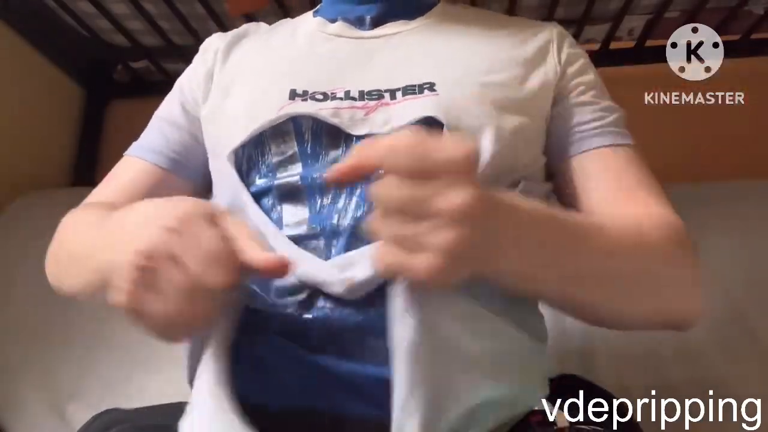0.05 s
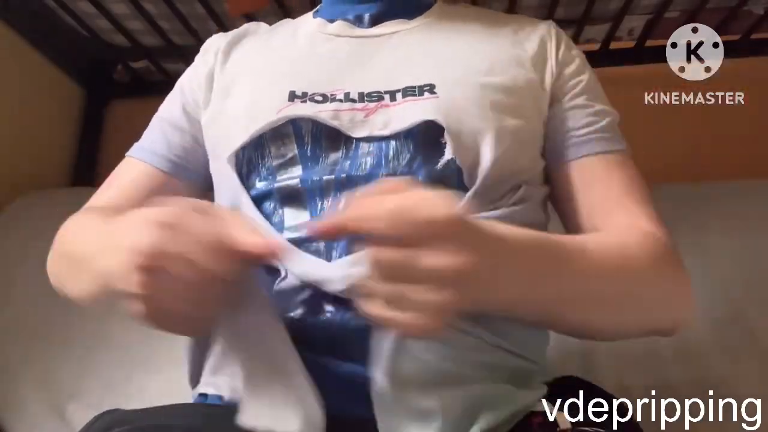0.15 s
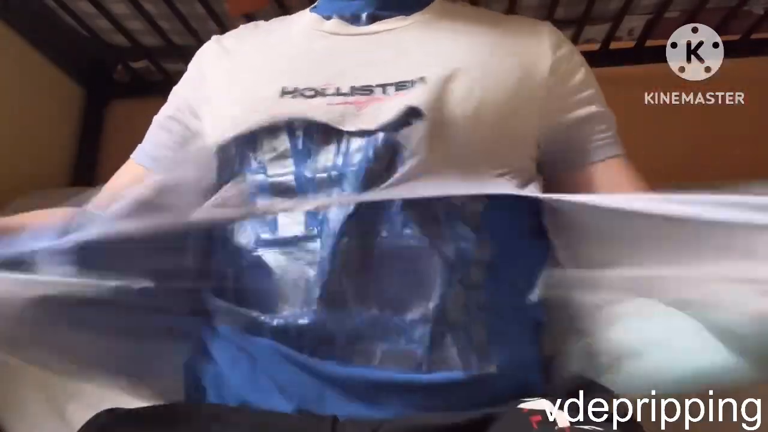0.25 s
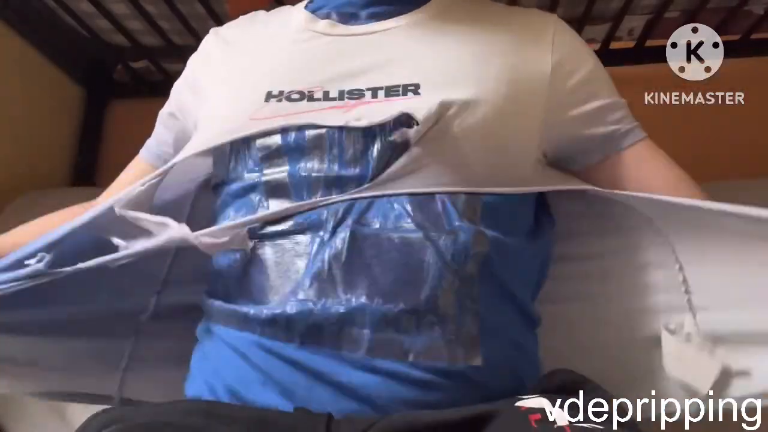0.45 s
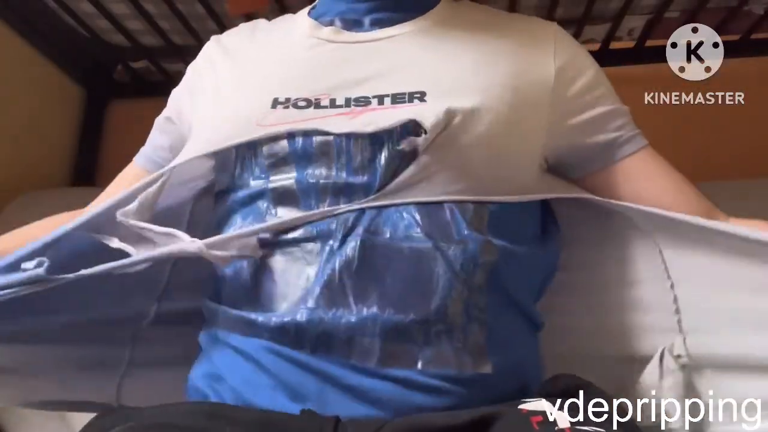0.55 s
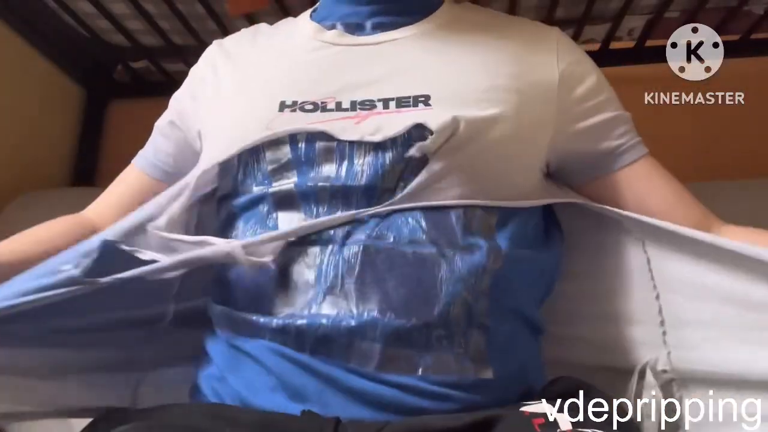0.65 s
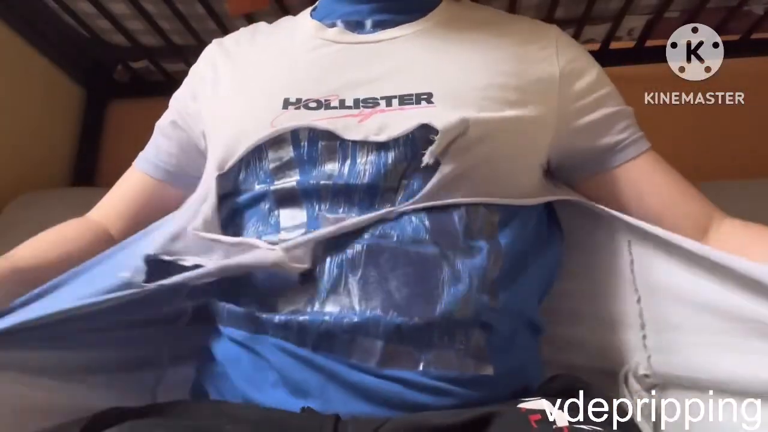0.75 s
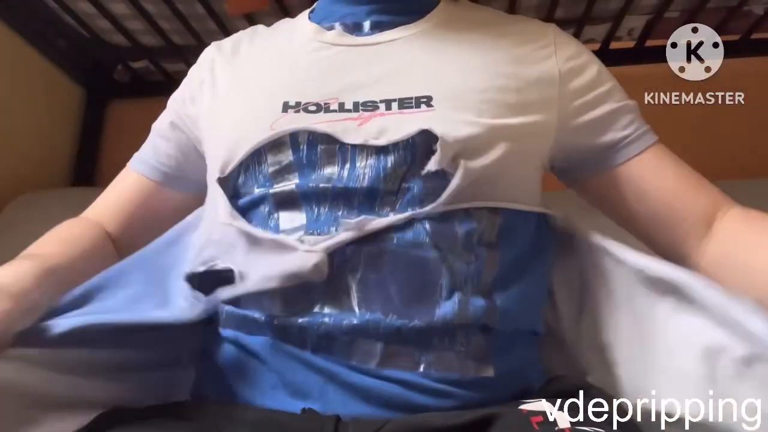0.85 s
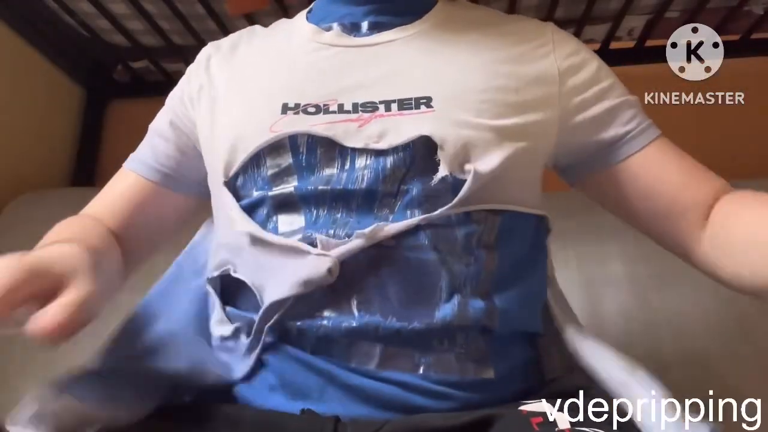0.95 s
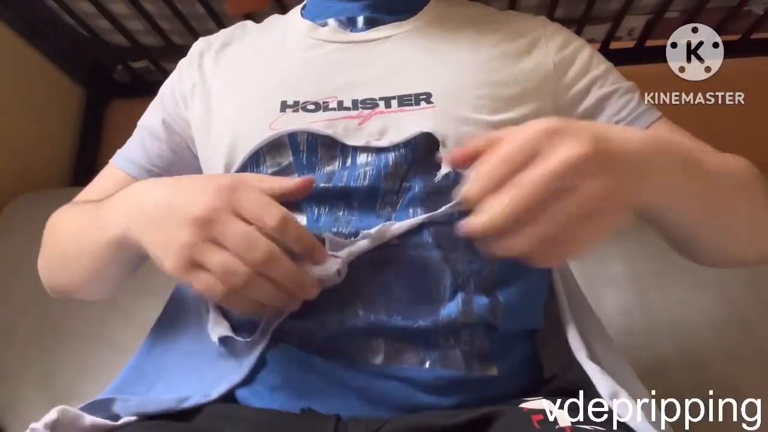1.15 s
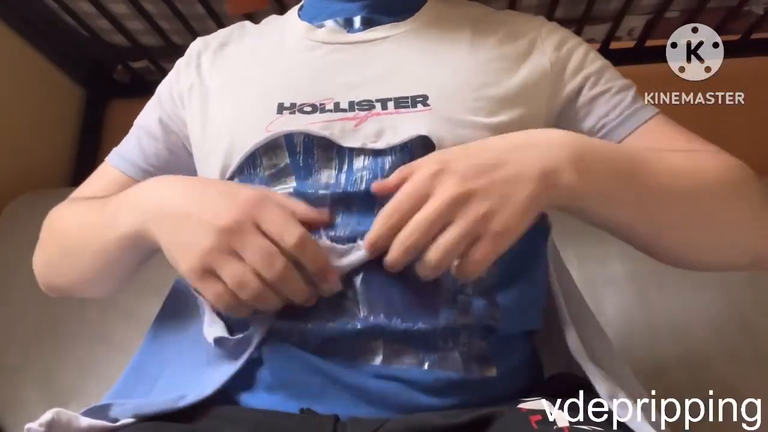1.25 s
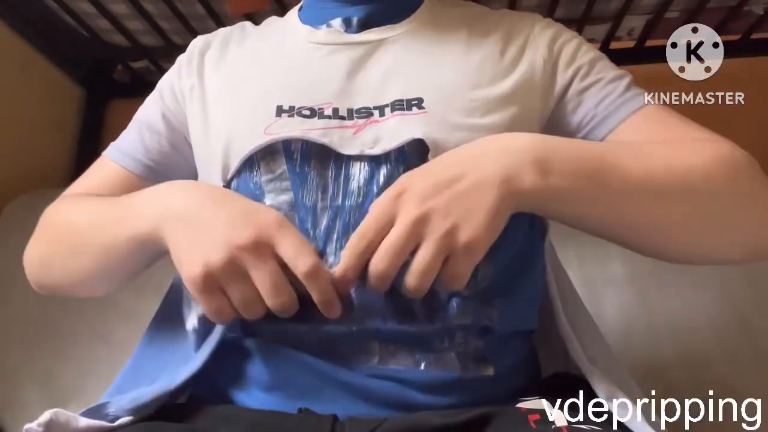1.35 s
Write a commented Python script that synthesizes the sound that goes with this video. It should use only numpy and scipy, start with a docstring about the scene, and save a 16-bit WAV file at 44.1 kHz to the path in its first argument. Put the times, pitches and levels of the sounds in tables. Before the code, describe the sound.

A cotton shirt is ripped by hand in one short, loud tear, with crackling threads and a low boom. Faint sliding, soft bumps and rustling of the cloth follow, close to the microphone in a small room.

```python
"""A cotton shirt is yanked apart by hand, close to the microphone in a small furnished room.
The edge gives with a sharp zip, then threads break in quick runs, each with a crack and a recoil,
while the taut cloth flutters. A low, wavering resonant hum swells into a boom during the rip.
Afterwards the cloth slides, bumps softly and is gathered up again."""
import sys
import numpy as np
from scipy import signal
from scipy.fft import rfft, irfft
from scipy.io import wavfile

SR = 44100
rng = np.random.default_rng(int(sys.argv[2]) if len(sys.argv) > 2 else 0)


def log_audio(samples):
    """Write samples as a 16-bit WAV file to the path given in sys.argv[1]."""
    # one column per channel
    frames = np.atleast_2d(samples).T
    # limit to full scale, then quantise
    limited = np.clip(frames, -1, 1)
    pcm = np.round(limited * 32767).astype(np.int16)
    wavfile.write(sys.argv[1], SR, pcm)


N = 61739
TIME, HZ = np.arange(N) / SR, np.fft.rfftfreq(2 * N, 1 / SR)


def amp(db):
    """Decibels to gain."""
    return 10 ** (np.asarray(db) / 20)

def unit(x):
    """Scales to rms 1."""
    return x / np.sqrt(np.mean(x ** 2) + 1e-20)

def read(points, hz=HZ):
    """Interpolates on a log-frequency axis."""
    f, value = np.transpose(points)
    return np.interp(np.log(hz + 1), np.log(f + 1), value)

def curve(points):
    """Control curve at every sample."""
    return np.interp(TIME, *np.transpose(points))

def shape(x, gain):
    """Filters by a gain per frequency."""
    return irfft(rfft(x, 2 * N) * gain)[..., :N]

def ring(x, db):
    """Minimum-phase filter: ringing follows the click."""
    log_gain = np.log(amp(db))
    phase = -signal.hilbert(np.r_[log_gain, log_gain[-2:0:-1]]).imag[:len(HZ)]
    return shape(x, np.exp(log_gain + 1j * phase))

def drift(rate_hz):
    """Random wander of rms 1."""
    return unit(shape(rng.standard_normal(N), np.exp(-(HZ / rate_hz) ** 2)))

def taps(table, rise_s):
    """Envelope of touches: linear rise, exponential decay."""
    return sum(amp(db) * np.clip((TIME - s) / rise_s, 0, 1) * np.exp(-np.maximum(TIME - s, 0) / decay_s)
               for s, db, decay_s in table)

# Direct and diffuse sound. Each row: frequency in Hz, left-right correlation.
DIRECT = [(60, .96), (300, 0.53), (1500, 0.59), (4000, .45), (7000, .7), (10000, .95), (16000, 0.88)]
DIFFUSE = [(60, 1), (200, 0.25), (600, 0.5), (5000, 0), (16000, 0.2)]
def stereo_noise(likeness, gain=1):
    """White noise in two partly alike channels."""
    a, b = rng.standard_normal((2, N)) * gain
    same = np.clip(read(likeness), -.999, .999)
    return np.array([a, shape(a, same) + shape(b, np.sqrt(1 - same ** 2))])

def noise(colour, likeness=DIFFUSE, grain_db=0):
    """Coloured stereo noise of rms 1; grain_db spreads its click sizes."""
    size = amp(grain_db * np.minimum(rng.exponential(1, N), 5))
    return unit(shape(stereo_noise(likeness, size), amp(read(colour))))


# Background spectrum. Each row: frequency in Hz, gain in dB.
FLOOR_COLOUR = [(20, -11.5), (50, -4), (90, -1), (140, -9.5), (300, -14.5), (600, -22.5), (1500, -27),
                (4000, -34.5), (10000, -36.5), (16000, -41)]
def noise_floor(level_db=-70.5):
    """Faint, steady rumble."""
    return amp(level_db) * noise(FLOOR_COLOUR)

# Resonant hum. Each row: time in seconds, level in dB.
HUM_DB = [(0, -61), (.16, -71), (.19, -46), (.215, -44.5), (.24, -34.5), (.27, -31), (.305, -23),
          (.35, -37), (.39, -40), (.45, -53.5), (.61, -68), (.69, -60), (.78, -76), (.84, -62),
          (.92, -68.5), (1.06, -55), (1.2, -66), (1.4, -81.5)]
# Its pitch. Each row: time in seconds, frequency in Hz.
HUM_HZ = [(.2, 51.76), (.3, 67), (.37, 72.6), (.47, 53.06), (1.4, 53.42)]
def hum(waver_hz=3, waver_db=1.5):
    """A low, wavering resonant hum near 50-70 Hz swells into a boom during the rip."""
    turns = np.cumsum(curve(HUM_HZ) + waver_hz * drift(rate_hz=8.3)) / SR
    level_db = curve(HUM_DB) + waver_db * drift(rate_hz=24)
    return np.sqrt(2) * np.sin(2 * np.pi * turns) * amp(level_db)

# Sheet flutter, fibre crackle. Each row: time in seconds, level in dB.
FLUTTER_DB = [(.15, -91), (.2, -64), (.238, -30.5), (.278, -37), (.288, -30.5), (.32, -23.5), (.355, -29.5),
              (.38, -49.5), (.45, -73), (.52, -87.5)]
FIBRE_DB = [(.18, -105), (.206, -78.5), (.215, -57), (.228, -52), (.237, -44.5), (.245, -24), (.257, -34.5),
            (.268, -34), (.285, -31), (.32, -35), (.355, -35), (.372, -54.5), (.42, -95)]
# Their spectra. Each row: frequency in Hz, gain in dB.
FLUTTER_COLOUR = [(20, -28.5), (55, -17.5), (90, 3), (122, -8.5), (160, -0.5), (195, -1), (320, -1),
                  (440, -6.5), (620, -14), (1200, -27.5), (4000, -58.5)]
FIBRE_COLOUR = [(100, -1.5), (300, -3.5), (900, -3.5), (2300, -11.5), (4000, -19), (9500, -20.5),
                (12000, -26.5), (16000, -25.5)]
def stretching():
    """The sheet flutters and fibres crackle under the pull."""
    flutter = noise(FLUTTER_COLOUR, DIRECT) * amp(curve(FLUTTER_DB))
    fibre_db = curve(FIBRE_DB) + .73 * drift(rate_hz=100)
    return flutter + noise(FIBRE_COLOUR, DIRECT, grain_db=4) * amp(fibre_db)

# Fibre catches. Each row: start in seconds, level in dB, decay in seconds.
TICKS = [(.2085, -54, 0.0047), (.4495, -62, 0.0027), (.890, -69, 0.014), (.9045, -69, .002),
         (1.264, -55, 0.0064), (1.289, -62.5, 0.0073)]
# Their spectrum. Each row: frequency in Hz, gain in dB.
TICK_COLOUR = [(300, -1), (2000, 6.5), (3900, 11), (5500, 9), (7500, 12.5), (12000, -9), (16000, -18)]
def ticks():
    """Fibres catch with small ticks."""
    return noise(TICK_COLOUR) * taps(TICKS, rise_s=.0011)

# Scrape spectrum. Each row: frequency in Hz, gain in dB.
EDGE_COLOUR = [(100, 0), (900, 0), (3200, -1), (4500, -4), (9300, -1), (11000, -5), (12800, 4), (14000, 10),
               (15300, 15), (16000, 8)]
def edge(start_s=.2392, length_s=.004, ramp_s=.0009, gain_db=-18.5):
    """The edge gives way with a brief, very bright scrape."""
    gate = np.clip(np.minimum(TIME - start_s, start_s + length_s - TIME) / ramp_s, 0, 1)
    return gate * shape(stereo_noise(DIRECT), amp(gain_db + read(EDGE_COLOUR)))

# Runs of breaking threads. Each row: start in seconds, length in seconds, level in dB.
THREAD_RUNS = [(.2736, .0055, 0), (.2796, .002, -1), (.2836, .001, -1), (.2860, .001, -2), (.3017, .006, 0),
               (.3112, .003, 0), (.3152, .003, 0), (.3226, .003, 0), (.3266, .001, -2), (.3330, .001, -1),
               (.3361, .002, -1), (.3441, .001, -1), (.3462, .001, -2), (.3493, .001, -1),
               (.3606, .001, -2)]
# Crack and recoil spectra. Each row: frequency in Hz, gain in dB.
CRACK_COLOUR = [(200, -5), (900, 10), (2350, 8), (2800, -4.5), (3250, -2), (3900, -3.5), (6000, -2),
                (7700, -7.5), (9400, -2), (11200, -14), (13500, 0), (15500, -0.5)]
RECOIL_COLOUR = [(60, 1), (200, 8.5), (450, 2), (700, -1), (1000, -2), (1500, -3), (2350, 0.5),
                 (2900, -6.5), (4000, -7), (16000, -14.5)]
def threads(gap_s=.00115, jitter_s=.00016, spread_db=1):
    """Threads part in turn: a crack of bursting fibres, then a push as the weave recoils."""
    crack_db, rise_s = -19, .00032
    recoil_db, lag_s, width_s, scatter_s = -16, .0006, .00016, .00004
    crack_power, recoil = np.zeros(N), np.zeros((2, N))
    for (start_s, length_s, db), draws in zip(THREAD_RUNS, rng.standard_normal((len(THREAD_RUNS), 10, 4))):
        for due_s, (late, size, width, side) in zip(np.arange(0, length_s, gap_s), draws):
            age_s = TIME - start_s - due_s - jitter_s * late
            gain = amp(db + spread_db * size)
            rise = np.maximum(age_s, 0) / rise_s
            crack_power += (gain * rise * np.exp(1 - np.minimum(rise, 20))) ** 2
            side_s = np.array([[side], [-side]]) * scatter_s  # threads lie a little left or right
            push = np.clip((age_s - lag_s - side_s) / (width_s * np.exp(.39 * width)), -10, 10)
            recoil += gain * push * np.exp(.5 - push ** 2 / 2)
    cracks = ring(stereo_noise(DIRECT, np.sqrt(crack_power)), crack_db + read(CRACK_COLOUR))
    return cracks + ring(recoil, recoil_db + read(RECOIL_COLOUR))

# Cloth friction. Each row: time in seconds, level in dB.
SLIDE_DB = [(.3, -105), (.40, -58.5), (.46, -61.5), (.49, -72.5), (.54, -76), (.59, -66), (.65, -65.5),
            (.73, -73), (.85, -78.5), (.9, -75), (.96, -94), (1.05, -102)]
# Its spectrum. Each row: frequency in Hz, gain in dB.
SLIDE_COLOUR = [(300, -18), (1000, -16), (3200, -16), (5500, -6.5), (9300, -0.5), (12500, -8), (14200, -18),
                (16000, -7)]
def slide():
    """Cloth slides over the body."""
    return noise(SLIDE_COLOUR, grain_db=2.5) * amp(curve(SLIDE_DB) + 1.1 * drift(rate_hz=63))

# Soft impacts. Each row: start in seconds, level in dB, decay in seconds.
BUMPS = [(.595, -58.5, 0.028), (.82, -66, 0.026), (.885, -63.5, 0.022), (1.085, -62, 0.031),
         (1.13, -69, 0.017)]
FLAP = [(.9735, -61.5, 0.0069)]
# Their spectra. Each row: frequency in Hz, gain in dB.
BUMP_COLOUR = [(40, 11), (110, 13.5), (190, 6.5), (290, 8.5), (600, -10.5), (1200, -20), (4000, -69)]
FLAP_COLOUR = [(100, -14), (500, -2), (1000, -22), (2000, -40), (8000, -52)]
def bumps():
    """Arms and cloth bump; a loose end lands with a flap."""
    thuds = noise(BUMP_COLOUR) * taps(BUMPS, rise_s=.002)
    return thuds + noise(FLAP_COLOUR) * taps(FLAP, rise_s=.0016)

# Rustle. Each row: time in seconds, level in dB.
GATHER_DB = [(1.15, -110), (1.215, -79.5), (1.245, -61.5), (1.275, -65.5), (1.293, -64), (1.33, -64),
             (1.358, -53), (1.385, -55.5), (1.4, -55.5)]
# Its spectrum. Each row: frequency in Hz, gain in dB.
GATHER_COLOUR = [(300, -13.5), (800, -19.5), (1300, -8), (3000, -6), (5500, 0), (8400, 1), (10500, -1.5),
                 (12500, -11), (14200, -17.5), (16000, -5.5)]
def gather():
    """Fingers gather the cloth."""
    return noise(GATHER_COLOUR, grain_db=3.5) * amp(curve(GATHER_DB) + .7 * drift(rate_hz=150))

# Echoes off body and walls. Each row: delay in seconds, left gain in dB, right gain in dB.
ECHOES = [(.0021, -16, -18.5), (.0037, -17, -17.5), (.0062, -20, -20.5), (.0094, -17.5, -13.5)]
def reflections(x, dull_hz=3491):
    """Early echoes, dulled by soft surfaces."""
    echoes = sum(amp([[left], [right]]) * np.exp(-2j * np.pi * HZ * delay_s)
                 for delay_s, left, right in ECHOES)
    return shape(x, echoes / (1 + 1j * HZ / dull_hz))

# Room decay. Each row: frequency in Hz, seconds to fall 60 dB.
ROOM_T60_S = [(100, .24), (220, 0.33), (500, 0.19), (1500, 0.21), (4000, 0.3), (10000, 0.11), (16000, 0.13)]
# Tail spectrum. Each row: frequency in Hz, gain in dB.
ROOM_COLOUR = [(100, -5), (220, -5), (400, -1), (1000, 2), (2400, 0), (4000, 1), (6000, -2), (10000, -3),
               (13000, -10), (16000, -22)]
def room(x, gain_db=-14.5, delay_s=.0026):
    """Short diffuse tail; the highest treble dies first."""
    hz, t, spectra = signal.stft(stereo_noise(DIFFUSE), SR, nperseg=256)
    decay = amp(-60 * t / read(ROOM_T60_S, hz)[:, None])
    tail = signal.istft(spectra * decay, SR, nperseg=256)[1][:, :N]
    tail = unit(tail * np.clip(TIME / delay_s - 1, 0, 1)) / np.sqrt(N)
    wet = signal.fftconvolve(x[:1], tail, axes=1)[:, :N]
    return shape(wet, amp(gain_db + read(ROOM_COLOUR)))

# Microphone port phase. Each row: frequency in Hz, left lead in radians.
PORT_LEAD_RAD = [(20, 0), (70, .1), (300, -.45), (550, -1.2), (950, -1.9), (1750, -2.3), (2300, -.6),
                 (4500, -.2), (7200, -1.5), (9200, 0), (11000, .1), (12500, 2), (15300, 3.9)]
# Port balance. Each row: frequency in Hz, left minus right in dB.
PORT_BALANCE_DB = [(60, -2.8), (400, -3), (1000, -4), (1700, -4), (2400, 5), (3300, 0), (4500, -3.5),
                   (8000, -1), (14000, 0)]
def scene(quiet_balance_db=-1.4):
    """The rip reaches the right port first; room, handling and a quiet floor surround it."""
    rip = threads() + edge() + stretching()
    direct = shape(rip + hum(), np.exp(1j * np.outer([1, 0], read(PORT_LEAD_RAD))))
    sides = np.array([[.5], [-.5]])
    loud = shape(direct + reflections(rip) + room(rip), amp(sides * read(PORT_BALANCE_DB)))
    quiet = noise_floor() + ticks() + slide() + bumps() + gather()
    return loud + quiet * amp(sides * quiet_balance_db)

def record(dry, cutoff_hz=16200):
    """Low-pass band limit."""
    lowpass = signal.firwin(301, cutoff_hz, window=("kaiser", 9), fs=SR)
    return signal.oaconvolve(dry, lowpass[None], "same")


dry = scene()
out = record(dry)
log_audio(out)
```